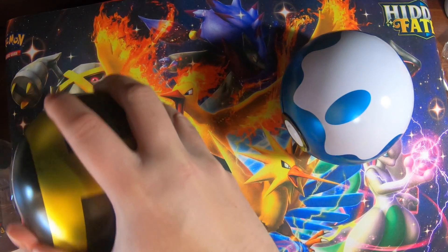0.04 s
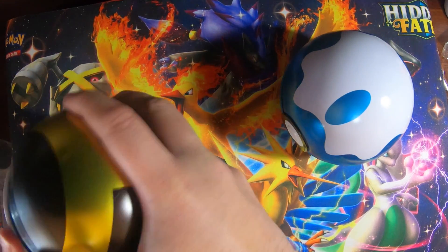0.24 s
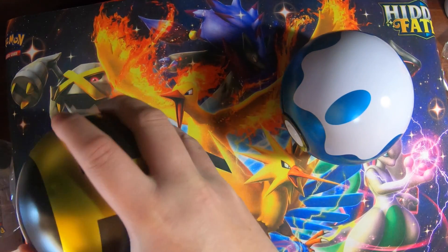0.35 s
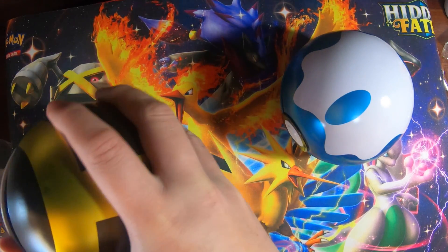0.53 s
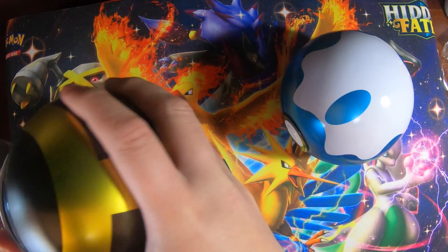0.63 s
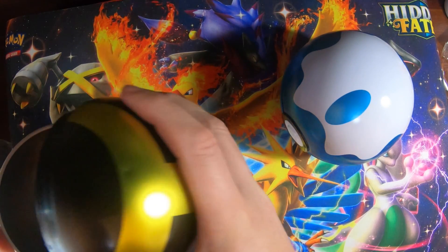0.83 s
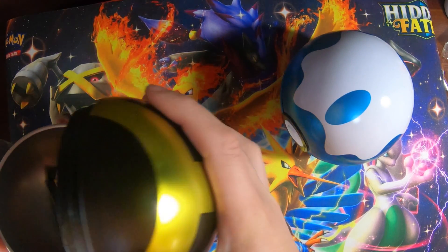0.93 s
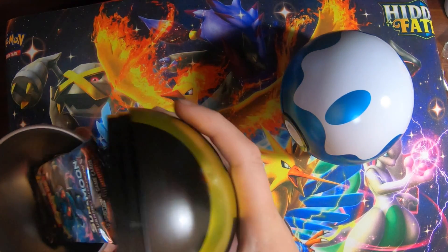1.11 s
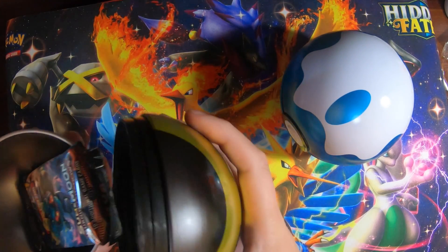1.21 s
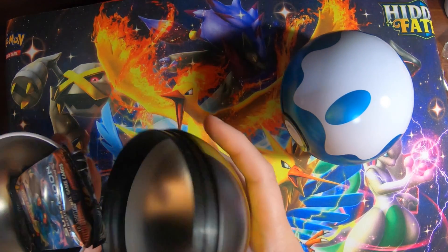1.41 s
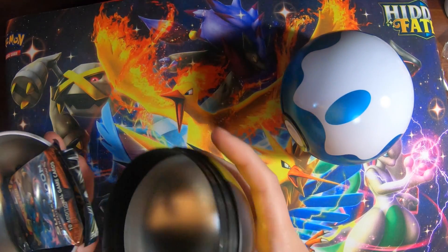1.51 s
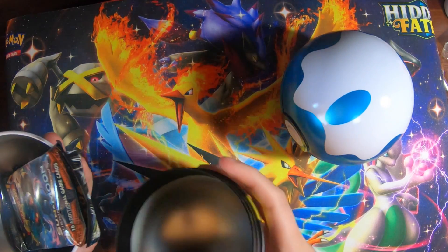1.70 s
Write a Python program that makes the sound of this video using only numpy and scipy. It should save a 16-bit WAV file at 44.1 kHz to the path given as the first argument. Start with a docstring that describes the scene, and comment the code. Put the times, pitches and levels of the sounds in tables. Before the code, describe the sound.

Close up in a small room, a metal tin's lid pops free with a hollow clack and a dull thump. Its rims clatter and grind for a moment, then soft rustling and light ticks follow as the lid slides away.

```python
"""A ball-shaped metal tin is pried open by hand on a padded table, close to the microphone.
The seam ticks, the wall flexes, and at 0.23 s the lid pops free and the tin thumps the table.
The halves clack and scrape past each other until about 0.47 s. Then the lid is drawn away,
rubbing over the foil packs inside with a few light ticks, and fades into a low room hum."""
import sys
import numpy as np
from scipy import signal
from scipy.fft import rfft, irfft
from scipy.io import wavfile
from scipy.ndimage import uniform_filter1d

SR = 44100
rng = np.random.default_rng(int(sys.argv[2]) if len(sys.argv) > 2 else 0)


def persist_wave(psi):
    """Save psi, clipped to +-1, as 16-bit WAV."""
    counts = np.round(np.clip(psi, -1, 1) * 32767).astype(np.int16)
    wavfile.write(sys.argv[1], SR, np.atleast_2d(counts).T)


N = 77175
T = np.arange(N) / SR

# wall flexes: t/s, f/Hz, level/dB, t60/s
FLEXES = [(0.1993, 285.8, -33, 0.062), (.2088, 284.9, -22, .05), (1.178, 370, -57, .05),
          (1.272, 330, -52, .06)]
# knocks on the table: t/s, level/dB
THUMPS = [(0.2299, -11.5), (0.2363, -13), (0.3074, -27.5), (0.339, -35), (.452, -56)]
# modes of the closed tin on the table: f/Hz; level/dB; t60/s
BODY_HZ = [122, 165, 274, 325, 440, 582, 641]
BODY_DB = [-14.5, -7.5, -11, -2.5, -1, -12, -12.5]
BODY_T60_S = [.28, .09, .15, 0.032, 0.046, 0.031, 0.048]
def pop(release_s=.2308, swing_hz=370, swing_db=-5.5, half_length_s=.0016):
    """The wall flexes, the lid springs free in one swing of air, the tin thumps the table."""
    out = np.zeros((2, N))
    body = ring(zip(BODY_HZ, BODY_DB, BODY_T60_S))
    for s, hz, db, t60 in FLEXES:
        add(out, ring([(hz, db, t60)]), s)
    for s, db in THUMPS:
        add(out, amp(db) * body, s)
    since_s = T - release_s
    window = np.exp(-(since_s / half_length_s) ** 2)
    return out - amp(swing_db) * window * np.sin(2 * np.pi * swing_hz * since_s)


# bending modes of the freed half: f/Hz; level/dB; t60/s
WALL_HZ = [443, 586, 657, 729]
WALL_DB = [-4, -1, -5, -16.5]
WALL_T60_S = [0.06, .08, .08, 0.16]
# modes of the hollow between the halves: f/Hz; level/dB; t60/s
HOLLOW_HZ = [758, 808, 856, 885, 964, 1088, 1124, 1341, 1562, 1850]
HOLLOW_DB = [-23, -19, -17.5, 0, -17, -20, -18, -14.5, -24, -22]
HOLLOW_T60_S = [.1, .09, .09, .02, .07, .06, .07, 0.077, .04, .03]
# strongest rim modes: f/Hz, level/dB, t60/s
RIM_MODES = [(2650, -12.5, 0.2), (2780, -9.5, 0.096), (3225, 1.5, 0.1), (3340, -1, 0.087),
             (3710, -4.5, .07), (4830, -3, .06), (5220, -4.5, 0.056), (8140, -1, 0.045), (8300, -3.5, .06)]
# spectrum of the rim's dense ringing: f/Hz, level/dB
RIM_COLOUR = [(300, -27), (1000, 6), (1600, 5), (2200, 4), (3400, 6), (5000, 1.5), (6300, -5.5), (8500, 5),
              (10000, -14.5), (12000, -26), (15500, -32.5)]
# contacts of the halves: t/s, wall level/dB, hollow level/dB, rim level/dB
CLACKS = [(.2025, -50, -46, -52), (0.224, -28, -48, -37), (.2277, -37.5, -28.5, -21.5),
          (.2298, -33, -31.5, -25), (.2365, -24, -25, -29.5), (.3045, -44, -21.5, -30),
          (.3089, -34, -8, -33), (0.3182, -63, -40, -32.5), (.3265, -55, -40, -35), (.3358, -29, -18, -22),
          (.3378, -18, -28, -38.5), (.3508, -25.5, -37, -54), (.3785, -36, -54, -40),
          (.4035, -36.5, -38, -46.5), (.423, -48, -37.5, -33.5), (.4505, -46, -38, -38.5),
          (1.2775, -74, -50, -57)]
# light touches, hollow only: t/s, level/dB
TOUCHES = [(.502, -49.5), (.67, -39), (0.686, -61), (1.097, -56), (1.371, -52)]
def clacks(crack_db=-8, crack_t60_s=.0089, dense_db=-11.5, dense_t60_s=.075, modes_db=-15, width=.44):
    """Each contact cracks and rings wall, hollow and rim; the rim's modes mix anew each time."""
    out = np.zeros((2, N))
    wall = wide_ring(WALL_HZ, WALL_DB, WALL_T60_S)
    hollow = wide_ring(HOLLOW_HZ, HOLLOW_DB, HOLLOW_T60_S)
    rim_modes = np.array([ring([mode]) for mode in RIM_MODES])
    decay = amp(crack_db) * fade(crack_t60_s) + amp(dense_db) * fade(dense_t60_s)
    for s, wall_db, hollow_db, rim_db in CLACKS:
        shares = spread(*rng.choice([-1, 1], size=(2, len(RIM_MODES))), width)
        rim = decay * colour(noise(width), RIM_COLOUR) + amp(modes_db) * shares @ rim_modes
        add(out, amp(wall_db) * wall + amp(hollow_db) * hollow + amp(rim_db) * rim, s)
    for s, db in TOUCHES:
        add(out, amp(db) * hollow, s)
    return out


HISS_WIDTH, HOLLOW_WIDTH = .69, .81  # stereo side/mid
# edge snaps: t/s, level/dB, f/Hz
TICKS = [(.108, -54, 1800), (.1365, -35, 3300), (0.2295, -27, 8400), (0.24, -31.5, 8000),
         (0.3193, -33, 8000), (0.3369, -27, 3180), (1.121, -57, 4440), (1.263, -43, 3900),
         (1.274, -46, 3950), (1.3717, -71, 4200)]
def ticks(t60_s=.0086, tail_db=-17, tail_t60_s=.055, crack_db=-2.5, stage_q=1.3, top_hz=10500):
    """Small metal edges snap past each other: a crack and a short ring round one pitch."""
    out = np.zeros((2, N))
    decay = fade(t60_s) + amp(tail_db) * fade(tail_t60_s)
    for s, db, hz in TICKS:
        burst = noise(HISS_WIDTH)
        ringing = resonate(burst, [(hz, hz / (2 * stage_q), 0)])
        crack = amp(crack_db) * colour(burst, RIM_COLOUR)
        add(out, amp(db) * decay * (ringing + crack), s)
    return signal.sosfilt(signal.butter(6, top_hz, fs=SR, output="sos"), out)


# scrape spectrum: f/Hz, level/dB
SCRAPE_COLOUR = [(200, -13.5), (600, 7), (1400, -1), (2100, -4), (3400, 2), (5200, 0.5), (6500, -1.5),
                 (8300, -6.5), (10000, -7.5), (12000, -25), (15500, -38.5)]
# resonances under the scrape: f/Hz, width/Hz, level/dB
SCRAPE_HOLLOW = [(611.6, 160, 0.5), (796, 150, -5), (1326, 77, -1)]
# rim strokes: start t/s, peak t/s, end t/s, hiss level/dB, hollow level/dB
SCRAPES = [(0.222, .24, .25, -33.5, -29), (0.242, .3, .306, -40.5, -53.5), (.304, .32, .333, -36, -41),
           (.336, 0.337, .354, -37, -39), (0.357, 0.364, .412, -49.5, -44.5),
           (0.41, .422, .438, -49.5, -41), (0.4399, 0.447, 0.47, -42, -59)]
def scrapes(slips_per_s=2480, scatter_db=-.5, swell_db=4):
    """The rims grind past each other; stick-slip drives the metal and the hollow."""
    hiss = colour(sheet(slips(slips_per_s, scatter_db, HISS_WIDTH)), SCRAPE_COLOUR)
    hollow = resonate(slips(slips_per_s, scatter_db, HOLLOW_WIDTH), SCRAPE_HOLLOW)
    out = np.zeros((2, N))
    for start, peak, end, hiss_db, hollow_db in SCRAPES:
        out += stroke(start, peak, end, swell_db) * (amp(hiss_db) * hiss + amp(hollow_db) * hollow)
    return out


# rub spectrum: f/Hz, level/dB
RUB_COLOUR = [(200, 1), (500, -17.5), (900, -8), (1600, 3), (2200, -1.5), (2900, 0.5), (3800, 3.5),
              (5200, 1), (6500, -4.5), (8000, -4.5), (10000, -12.5), (12000, -27), (15500, -33)]
# narrow lid resonances: f/Hz, width/Hz, level/dB
RUB_LID = [(2816, 66, -0.5), (3660, 160, 1.5), (4134, 140, -2), (4480, 100, -8), (4864, 51, 0.5),
           (5425, 150, 0), (7500, 250, -5.5)]
# resonances of the open half: f/Hz, width/Hz, level/dB
RUB_HOLLOW = [(886, 120, 3), (1494, 120, 3.5), (1800, 29, -6.5)]
# lid strokes: start t/s, peak t/s, end t/s, hiss level/dB, hollow level/dB
RUBS = [(0, 0.088, 0.4, -68.5, -65.5), (0.471, .48, 0.5, -62, -63), (0.504, 0.556, 0.6, -51.5, -57.5),
        (0.6, 0.678, .7, -50.5, -50), (0.677, 0.708, 0.79, -55.5, -54), (0.78, 0.822, 0.89, -70, -68.5),
        (0.853, 0.892, 0.95, -65.5, -60.5), (.949, .964, .988, -50, -56.5), (0.987, 1.054, 1.096, -55, -62),
        (0.988, 1.013, 1.108, -67, -58), (1.131, 1.173, 1.233, -57.5, -56),
        (1.164, 1.198, 1.225, -56, -63.5), (1.234, 1.238, 1.262, -58.5, -68.5),
        (1.262, 1.278, 1.288, -52.5, -56), (1.374, 1.414, 1.46, -72.5, -63),
        (1.519, 1.595, 1.74, -80.5, -72.5)]
def rubs(slips_per_s=4760, scatter_db=2, swell_db=9, lid_db=-14, lift_s=.85, lift_ratio=.872):
    """The lid slides over the foil; its hollow's upper resonances drop once it is lifted."""
    friction = sheet(slips(slips_per_s, scatter_db, HISS_WIDTH))
    hiss = unit(colour(friction, RUB_COLOUR) + amp(lid_db) * resonate(friction, RUB_LID))
    grains = slips(slips_per_s, scatter_db, HOLLOW_WIDTH)
    near = resonate(grains, RUB_HOLLOW)
    lowered = [(hz * lift_ratio, width, db) for hz, width, db in RUB_HOLLOW[1:]]
    lifted = resonate(grains, RUB_HOLLOW[:1] + lowered)
    out = np.zeros((2, N))
    for start, peak, end, hiss_db, hollow_db in RUBS:
        hollow = lifted if peak > lift_s else near
        out += stroke(start, peak, end, swell_db) * (amp(hiss_db) * hiss + amp(hollow_db) * hollow)
    return out


def slips(rate_per_s, scatter_db, width):
    """Dense stick-slip clicks of uneven size, stereo."""
    hits = rng.random(N) < rate_per_s / SR
    sizes = amp(scatter_db * np.minimum(rng.exponential(size=N), 4))
    return unit(hits * sizes * spread(*rng.choice([-1, 1], size=(2, N)), width))


def stroke(start_s, peak_s, end_s, swell_db, edge_s=.004):
    """Pressure of one stroke: catch, swell, ease, release."""
    db = np.interp(T, [start_s, peak_s, end_s], [-swell_db, 0, -swell_db])
    return uniform_filter1d(amp(db) * (T >= start_s) * (T < end_s), int(edge_s * SR))


def sheet(x, t60_s=.071, ring_db=-2):
    """Add the brief, dense ringing of thin sheet metal."""
    ringing = unit(rng.standard_normal(N) * fade(t60_s)) / np.sqrt(N)
    return unit(x + amp(ring_db) * signal.fftconvolve(x, ringing[None], axes=1)[:, :N])


# rumble envelope: t/s, level/dB
HANDLING_LEVEL = [(0, -59.5), (.18, -59.5), (.36, -57), (.47, -59), (.5, -71), (.54, -55.5), (.68, -59.5),
                  (.82, -64.5), (1.28, -64.5), (1.4, -66.5), (1.75, -77.5)]
# rumble spectrum: f/Hz, level/dB
HANDLING_COLOUR = [(25, -27.5), (60, -10.5), (100, -14.5), (145, 6), (210, -3), (300, -13.5), (500, -37.5),
                   (2000, -64.5)]
def handling():
    """Low rumble of the hand shifting the tin."""
    level_db = np.interp(T, *np.array(HANDLING_LEVEL).T)
    return amp(level_db) * colour(noise(0), HANDLING_COLOUR)


# tin's stereo balance: f/Hz, left-minus-right level/dB
TIN_BALANCE = [(200, 0.5), (380, 1.2), (700, -4.5), (1300, -2.5), (4400, -2), (8000, -2), (15000, 5)]
def place(x):
    """Pan per frequency; the tin lies to the right of the microphone."""
    tilt_db = curve_db(TIN_BALANCE)
    return irfft(rfft(x) * amp(np.array([tilt_db, -tilt_db]) / 2), N)


def echo(x, level_db=-15, t60_s=.3, onset_s=.0017, low_cut_hz=250):
    """Faint, diffuse reflections of a small room."""
    tail = unit(noise(1) * fade(t60_s) * np.minimum(T / onset_s, 1)) / np.sqrt(N)
    tail = signal.sosfilt(signal.butter(2, low_cut_hz, "high", fs=SR, output="sos"), tail)
    return amp(level_db) * signal.fftconvolve(x, tail, axes=1)[:, :N]


# hum spectrum: f/Hz, level/dB
ROOM_COLOUR = [(15, -55.5), (25, -28), (49, -1), (71, -8), (95, -20.5), (186, 2), (293, -7.5), (344, -18.5),
               (373, -15), (588, -26), (856, -10), (1670, -26.5), (8780, -34.5), (15000, -48.5)]
def room_hum(level_db=-69, width=.23):
    """Steady low noise of the room."""
    return amp(level_db) * colour(noise(width), ROOM_COLOUR)


def ring(modes, wave=np.sin, build_cycles=.98):
    """Damped modes of a struck object (f/Hz, level/dB, t60/s), each with a short build-up."""
    return sum(amp(db) * fade(t60) * np.minimum(T * hz / build_cycles, 1) * wave(2 * np.pi * hz * T)
               for hz, db, t60 in modes)


def wide_ring(hz, db, t60_s, width=.4):
    """A large curved surface rings slightly out of phase left and right."""
    modes = list(zip(hz, db, t60_s))
    return spread(ring(modes), ring(modes, np.cos), width)


def resonate(x, peaks):
    """Parallel two-stage resonators (f/Hz, width/Hz, level/dB); output rms 1."""
    out = 0
    for hz, width_hz, db in peaks:
        b, a = signal.iirpeak(hz, hz / (2 * width_hz), fs=SR)
        out = out + amp(db) * signal.lfilter(b, a, signal.lfilter(b, a, x))
    return unit(out)


def curve_db(points):
    """Interpolate (f/Hz, level/dB) onto the FFT bins over log frequency."""
    hz, db = np.array(points, float).T
    bins_hz = np.maximum(np.fft.rfftfreq(N, 1 / SR), 1)
    return np.interp(np.log(bins_hz), np.log(hz), db)


def colour(x, points):
    """Filter by (f/Hz, level/dB), keeping the power of white noise."""
    return irfft(rfft(x) * unit(amp(curve_db(points))), N)


def noise(width):
    """Stereo white noise."""
    return spread(*rng.standard_normal((2, N)), width)


def spread(mid, side, width):
    """Mid/side to left/right."""
    return np.array([mid + width * side, mid - width * side]) / np.sqrt(1 + width ** 2)


def fade(t60_s):
    """Exponential decay."""
    return np.exp(-np.log(1000) * T / t60_s)


def amp(db):
    """Decibels to gain."""
    return 10 ** (np.asarray(db) / 20)


def unit(x):
    """Scale to rms 1."""
    return x / np.sqrt(np.mean(x ** 2) + 1e-20)


def add(out, x, start_s):
    """Mix x in from start_s."""
    i = round(start_s * SR)
    out[:, i:] += x[..., :N - i]


def scene():
    """Tin, echo and room hum."""
    tin = place(pop() + clacks() + ticks() + scrapes() + rubs() + handling())
    return tin + echo(tin) + room_hum()


def record(dry):
    """Steep low-pass at 15.3 kHz."""
    return signal.sosfilt(signal.ellip(8, .2, 70, 15300, fs=SR, output="sos"), dry)


dry = scene()
out = record(dry)
persist_wave(out)
```